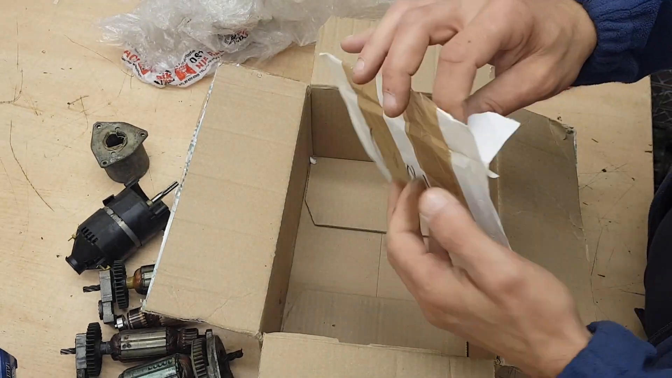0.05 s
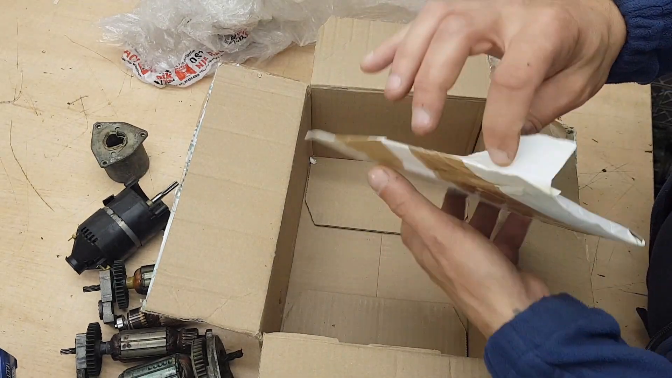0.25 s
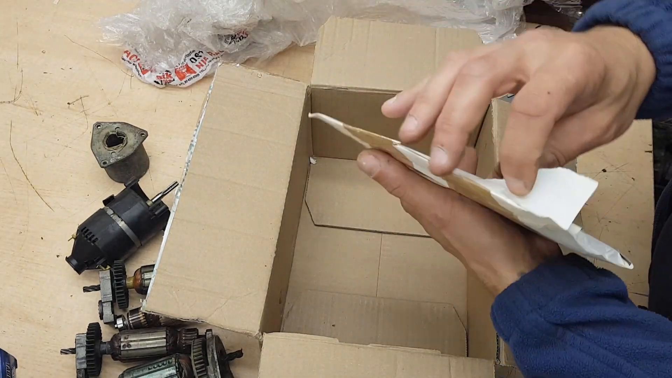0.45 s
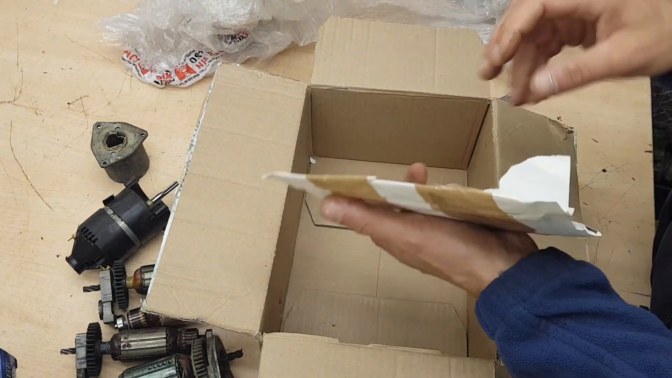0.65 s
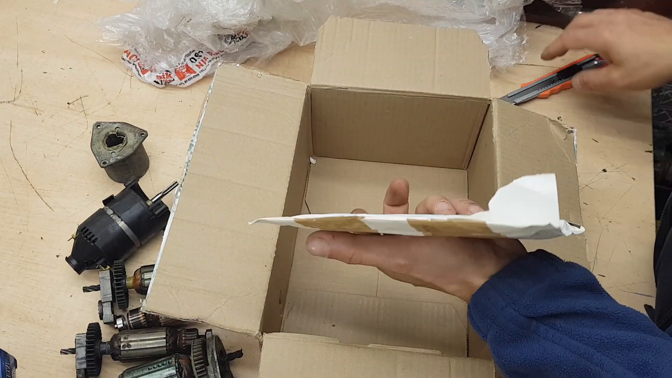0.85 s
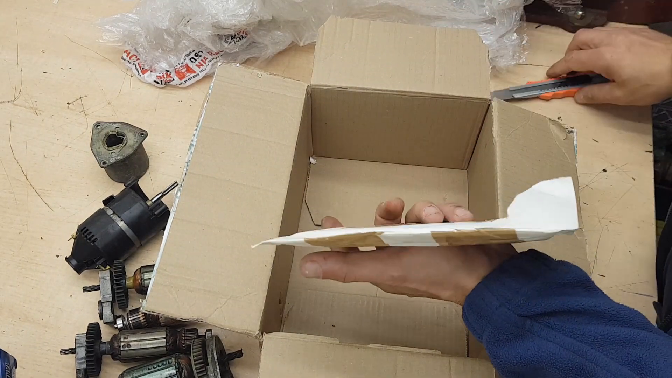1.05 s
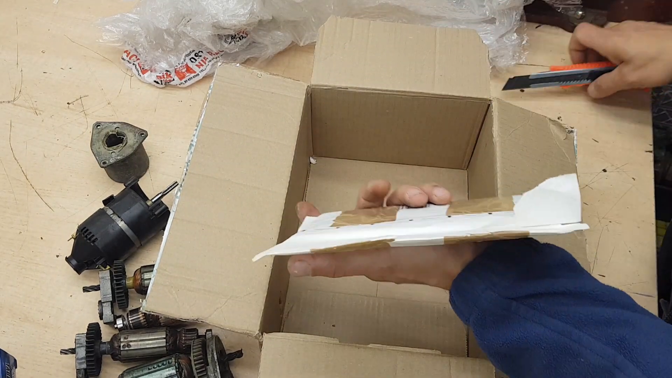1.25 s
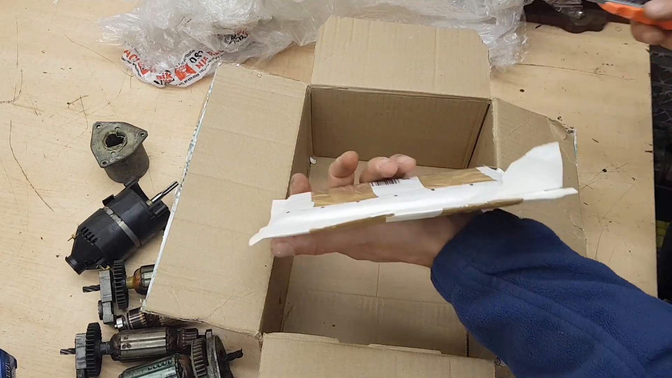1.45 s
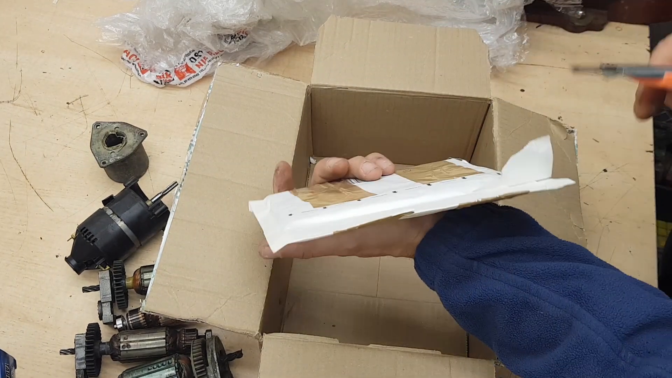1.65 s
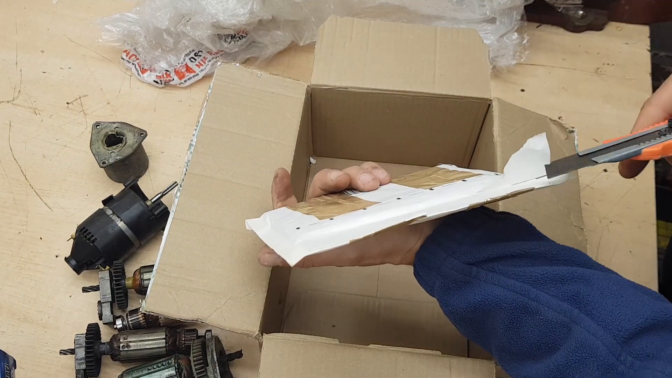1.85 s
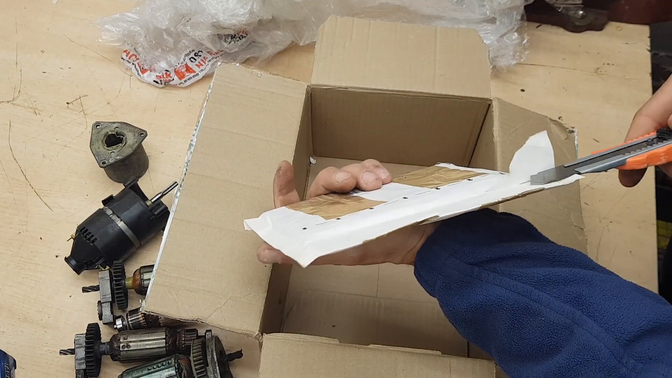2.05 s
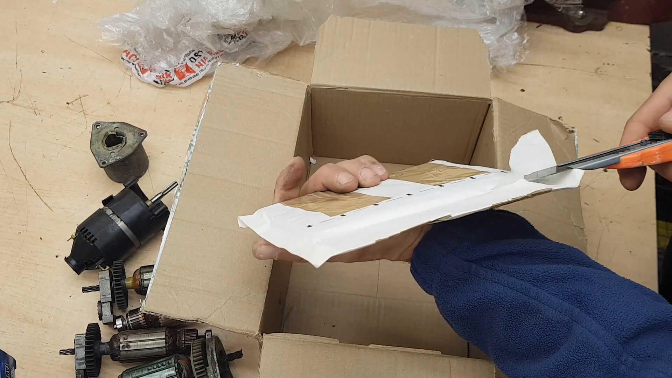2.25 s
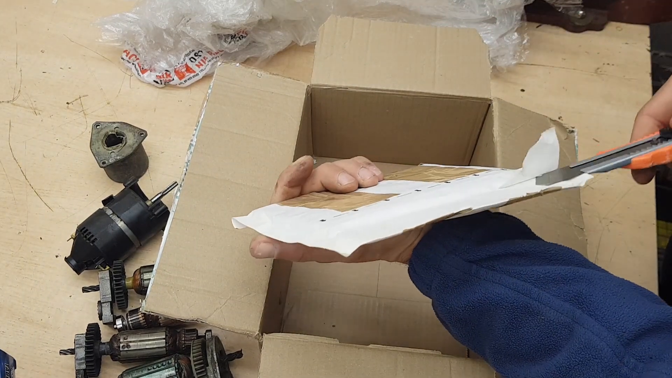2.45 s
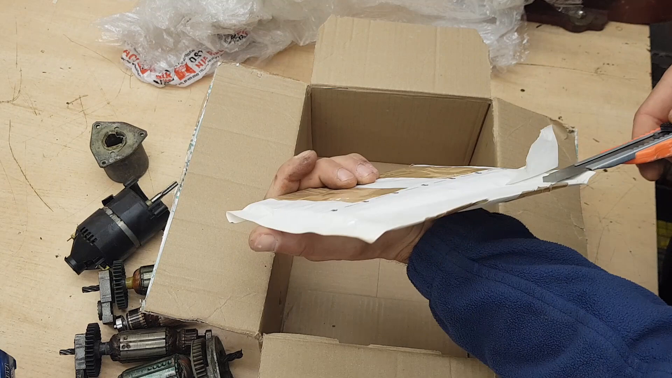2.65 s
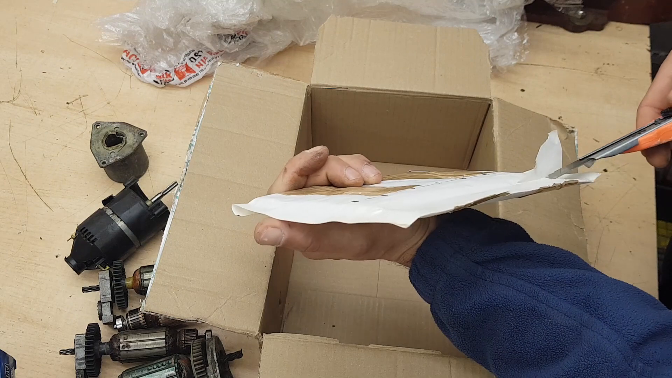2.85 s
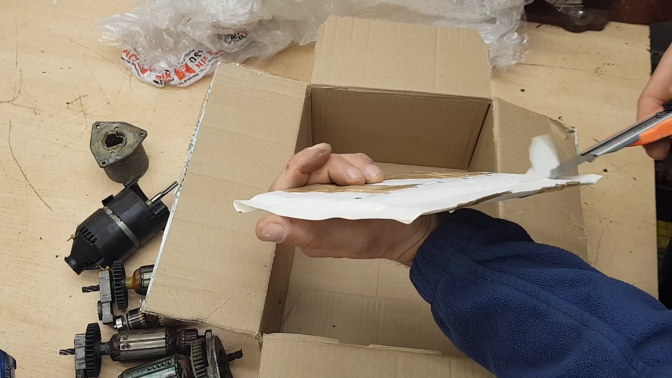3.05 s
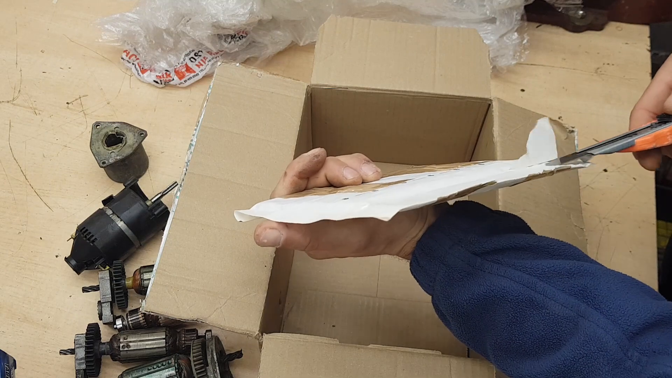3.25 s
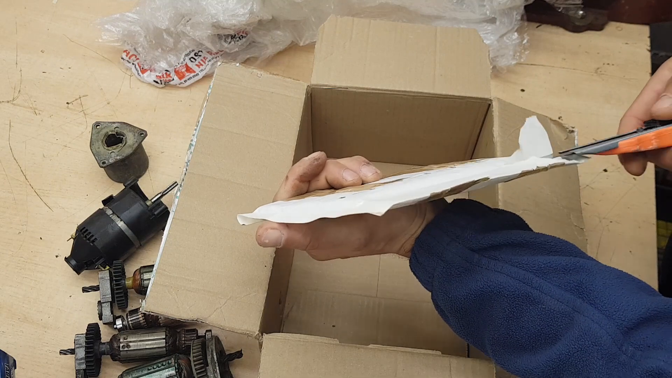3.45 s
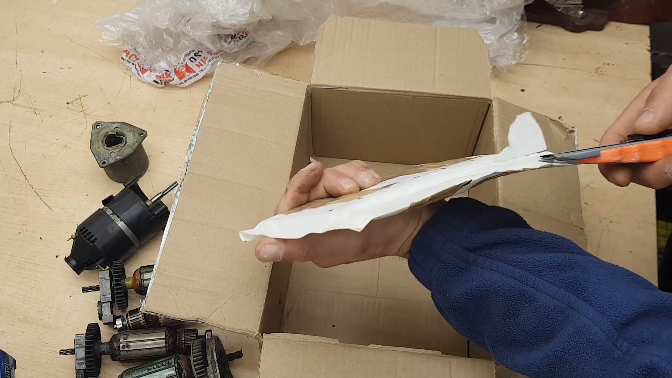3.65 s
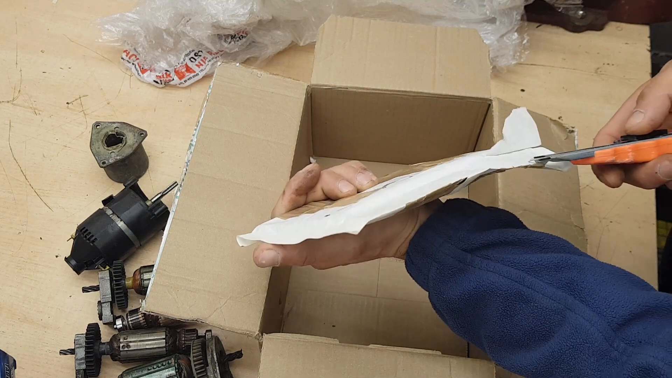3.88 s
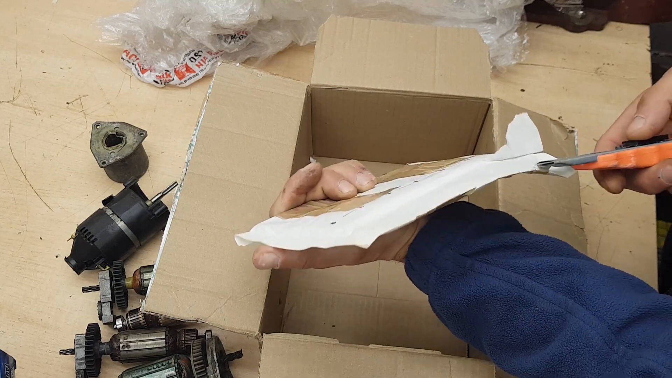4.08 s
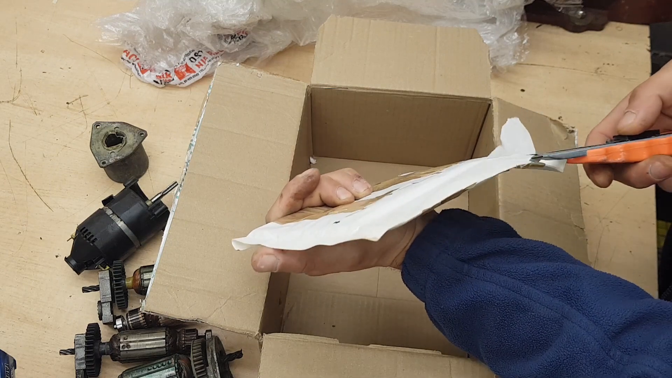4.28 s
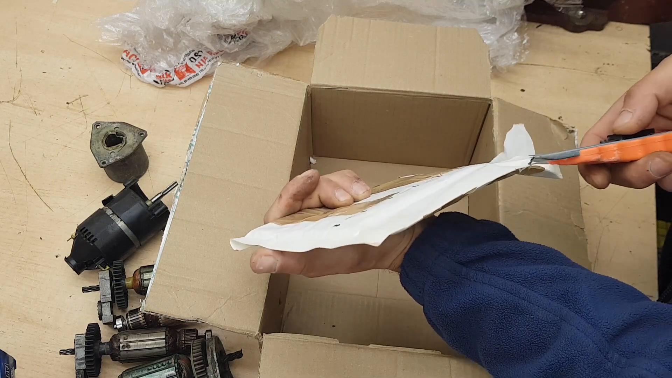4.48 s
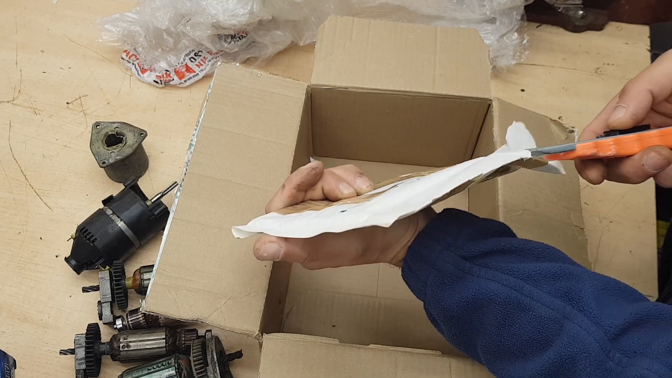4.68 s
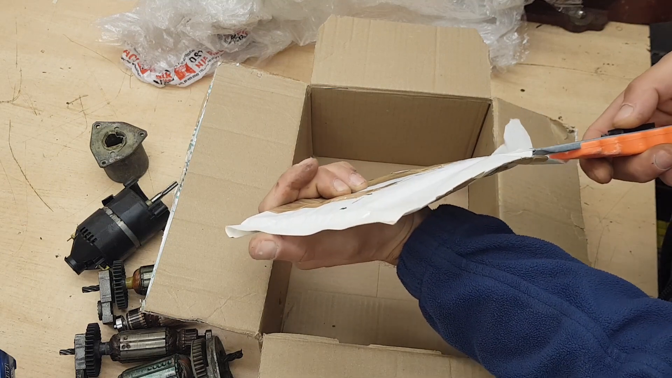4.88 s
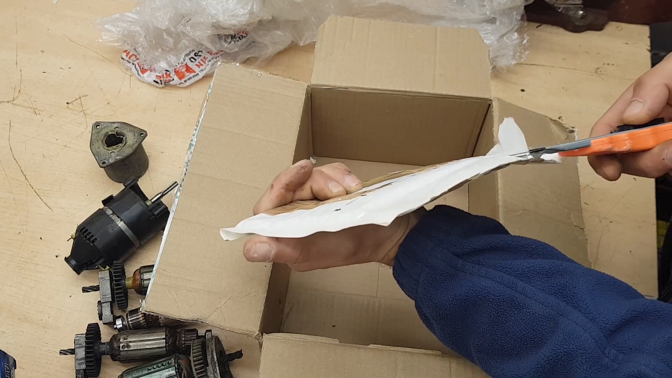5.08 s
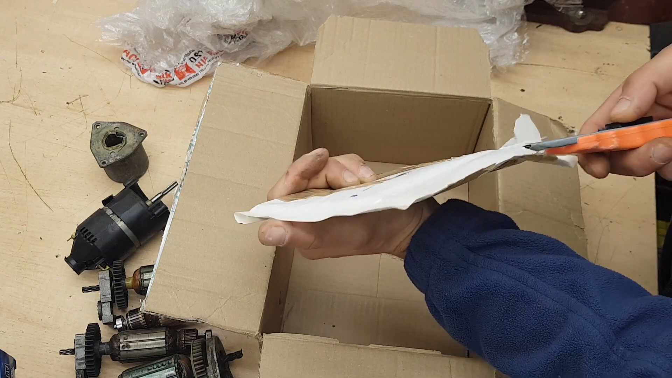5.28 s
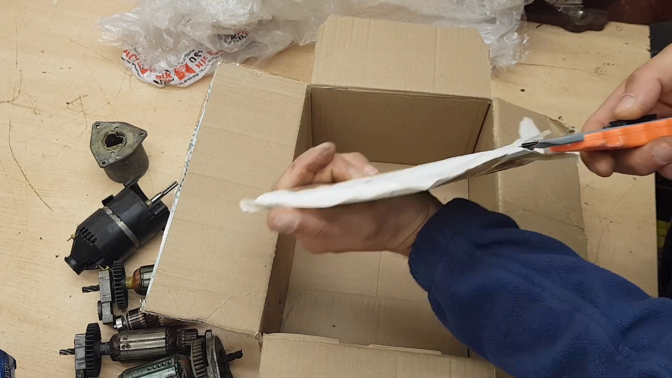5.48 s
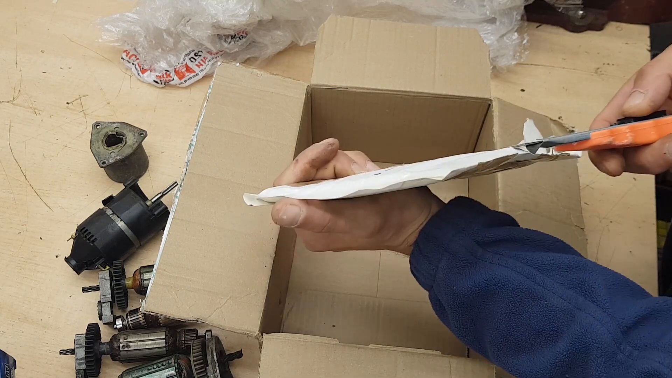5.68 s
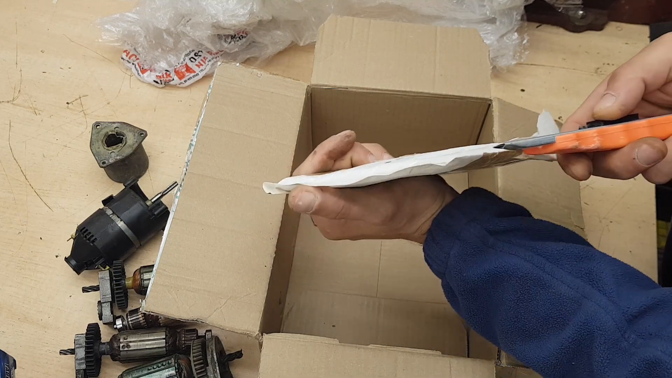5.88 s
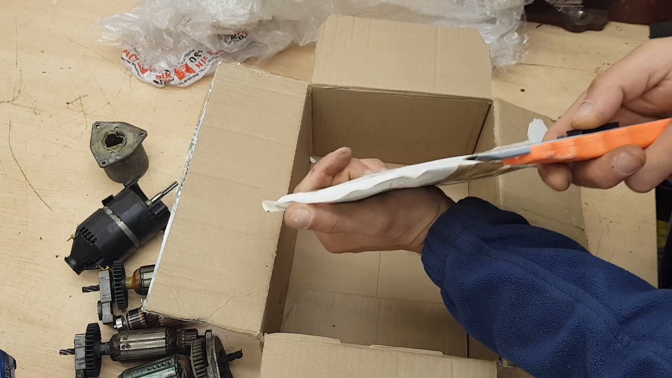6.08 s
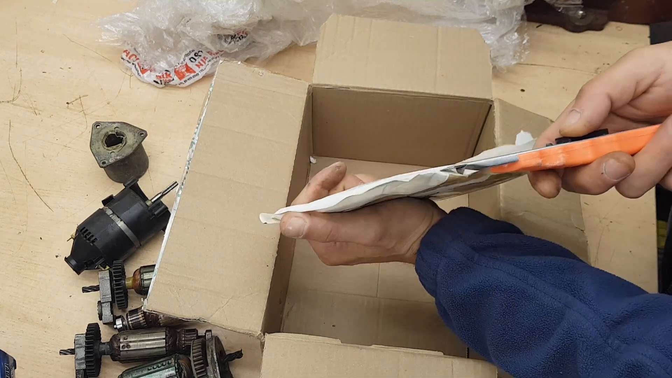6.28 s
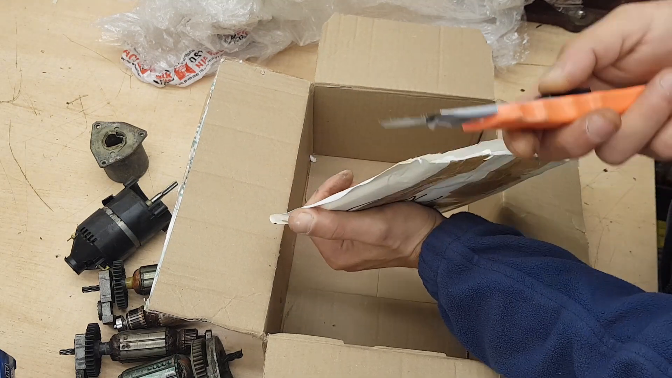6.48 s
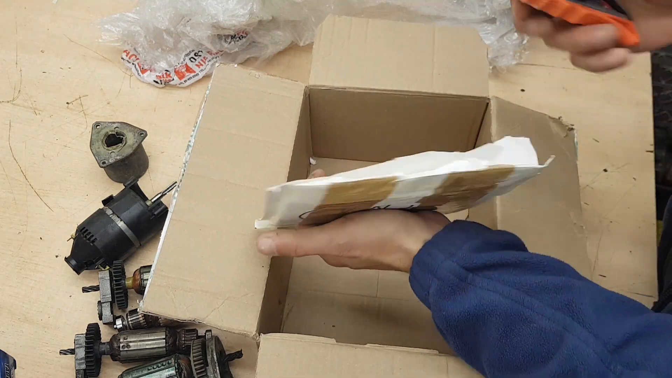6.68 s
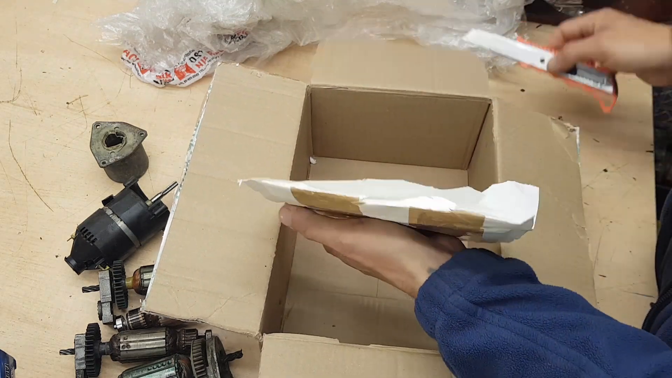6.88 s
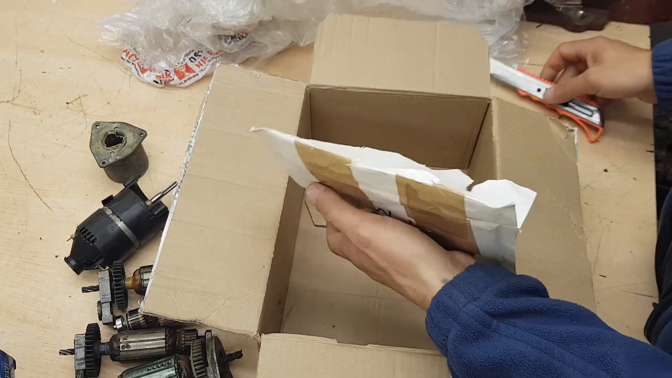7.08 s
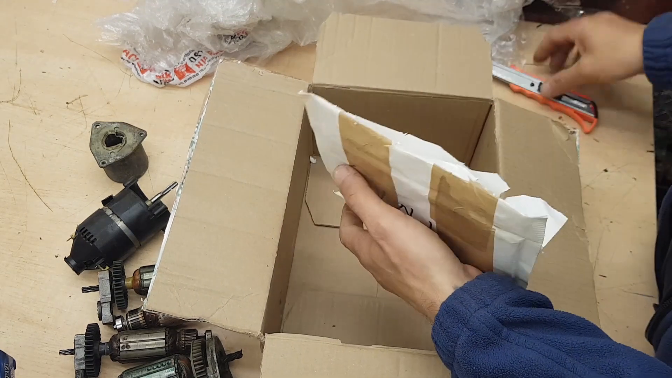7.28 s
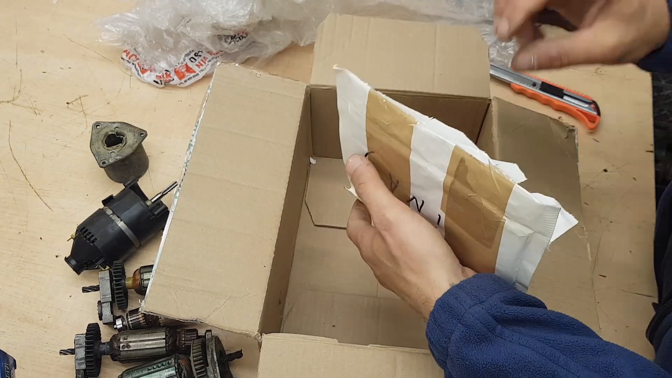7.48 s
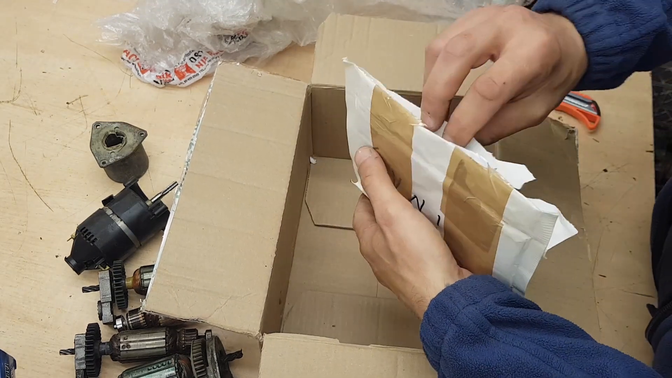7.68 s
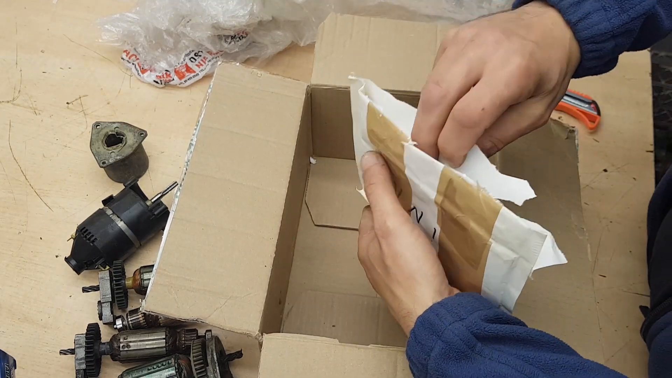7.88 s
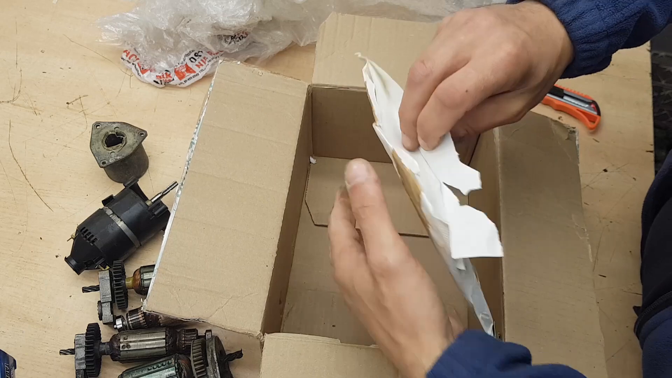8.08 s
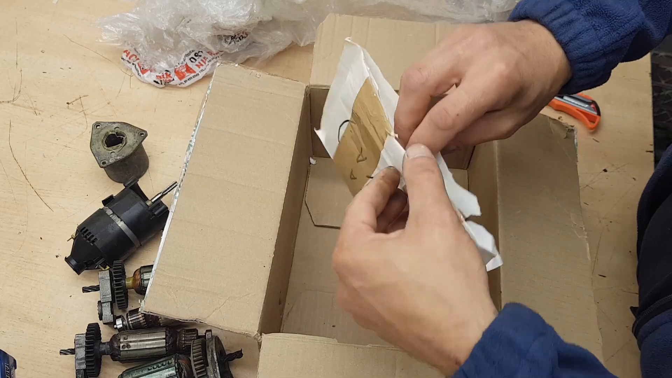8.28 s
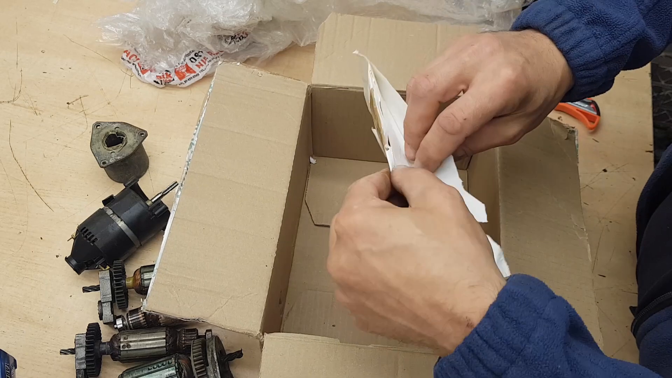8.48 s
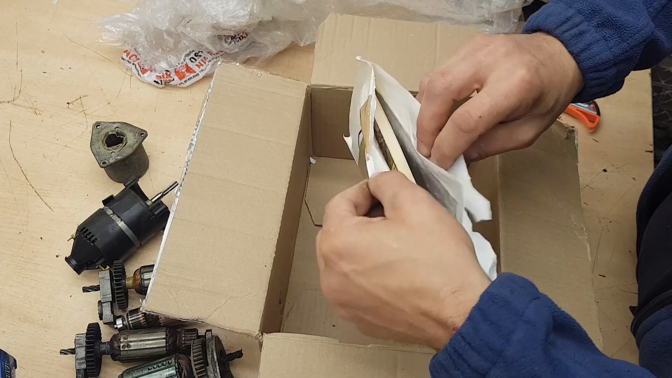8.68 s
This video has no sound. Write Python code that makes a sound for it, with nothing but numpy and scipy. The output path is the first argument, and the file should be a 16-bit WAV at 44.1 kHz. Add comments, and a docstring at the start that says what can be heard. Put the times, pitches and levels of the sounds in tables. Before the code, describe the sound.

In a small quiet workshop, stiff paper crinkles lightly, a knife scrapes off the bench and its blade ratchets out in quick clicks. After soft rustles it saws a taped envelope in short, uneven, gritty strokes that grow stronger, then springs free with a click. The knife knocks hard on wood, and fingers rustle and crackle the paper. Close stereo microphones, short reflections, faint low rumble and hiss.

```python
"""A small, quiet workshop: a padded envelope is slit open with a utility knife above a box on a wooden bench.
The blade ratchets out: filtered noise cracks and ringing steel. It saws the taped edge in short strokes of
snapping fibres, hissing and shaking the envelope, then springs free. The knife lands in a knock of bench
modes and noise, and fingers pull the paper apart in rustling rubs and crinkling flurries of snaps.
Reflections surround it all, over low rumble, faint hum and microphone hiss."""
import sys
import numpy as np
from scipy import signal
from scipy.fft import rfft, irfft
from scipy.io import wavfile
from scipy.ndimage import uniform_filter1d

SR = 44100
rng = np.random.default_rng(int(sys.argv[2]) if len(sys.argv) > 2 else 0)


def dump_mix(stems):
    """Bounce the given channels to the path in sys.argv[1] as a 16-bit WAV at rate SR."""
    frames = np.atleast_2d(stems).T  # one column per channel
    limited = np.clip(frames, -1, 1)  # hard clip at full scale
    pcm = np.round(limited * 32767).astype(np.int16)
    wavfile.write(sys.argv[1], SR, pcm)


N = 384993
TIME = np.arange(N) / SR
HIT_TIME = TIME[:16384]  # the span of one short event


def undb(db):
    """Decibels to gain."""
    return 10 ** (np.asarray(db) / 20)


def unit(x):
    """Scale to rms 1."""
    return x / np.sqrt(np.mean(x ** 2))


def freqs(x):
    """Frequency of each spectral bin of x, at least 1 Hz."""
    return np.maximum(np.fft.rfftfreq(x.shape[-1], 1 / SR), 1)


def colour(x, points):
    """Causal, minimum-phase equaliser through (f/Hz, level/dB) points."""
    hz, db = np.transpose(points)
    log_gain = np.log(undb(np.interp(np.log(freqs(HIT_TIME)), np.log(hz), db)))
    cepstrum = irfft(log_gain)
    half = len(cepstrum) // 2
    # folding the cepstrum onto positive time makes the filter causal
    cepstrum[1:half] *= 2
    cepstrum[half:] = 0
    response = irfft(np.exp(rfft(cepstrum)))
    return signal.fftconvolve(x, response)[:len(x)]


def band(x, hz, kind, order=4):
    """Butterworth filter."""
    corners = np.clip(hz, 20, .45 * SR)
    return signal.sosfilt(signal.butter(order, corners, kind, fs=SR, output="sos"), x)


def fade(t60):
    """Exponential decay over the span of a hit, down 60 dB after t60 seconds."""
    return undb(-60 * HIT_TIME / t60)


def ring(modes):
    """Sum of damped modes, alternately pushed one way and the other."""
    out = np.zeros(len(HIT_TIME))
    for k, (hz, db, t60) in enumerate(modes):
        out += (-1) ** k * undb(db) * fade(t60) * np.sin(2 * np.pi * hz * HIT_TIME)
    return out


def peak(x, db):
    """Bring the rms of the loudest 4 ms to a level."""
    return x * undb(db) / np.sqrt(uniform_filter1d(x ** 2, size=176).max())


def add(track, s, x):
    """Mix x into the track at time s."""
    start = max(round(s * SR), 0)
    track[start:start + len(x)] += x[:N - start]


def snaps(time, rate, spread_db):
    """Fibres snapping at random, rate a second, a few much louder than the rest."""
    chance = rng.random(len(time))
    size = np.clip(rng.standard_normal(len(time)), -2, 2)
    sign = rng.choice([-1, 1], len(time))
    return (chance < rate / SR) * undb(spread_db * size) * sign


def walk(rate):
    """Random wander around 0 along straight lines between rate normal draws a second."""
    knots = rng.standard_normal(4096)
    return np.interp(TIME * rate, np.arange(len(knots)), knots)


def swell(s, db, length):
    """Gain of one push of the hand: it builds up to a peak at s and lets go."""
    rise, fall = 0.46 * length, 0.54 * length  # each reaches 8.7 dB below the peak
    out = np.zeros(N)
    span = slice(max(int((s - 4 * rise) * SR), 0), int((s + 4 * fall) * SR))
    lag = TIME[span] - s
    out[span] = undb(db) * np.exp(-np.maximum(-lag / rise, lag / fall) ** 1.5)
    return out


def pushes(rows):
    """Gain of a series of pushes that share one shape, summed as power."""
    return sum(swell(*row) ** 2 for row in rows) ** .5


# Sawing strokes: peak t/s, push level/dB, length/s between the points 8.7 dB below the peak
SAWING_STROKES = [(3.511, -52, 0.21), (3.63, -40, 0.058), (3.744, -36, 0.054), (3.909, -49.5, 0.15),
                  (4.318, -54, 0.13), (4.473, -44, 0.073), (4.611, -57.5, 0.069), (4.762, -37.5, 0.035),
                  (4.827, -46.5, 0.098), (5.001, -56.5, 0.043), (5.1, -55.5, 0.017), (5.139, -41.5, 0.053),
                  (5.262, -38.5, 0.069), (5.436, -37.5, .08), (5.584, -36, 0.1), (5.714, -35.5, 0.043),
                  (5.868, -31.5, 0.1), (6.078, -39.5, 0.046), (6.228, -37, 0.042), (6.379, -30, 0.076)]
# Tone balance of the cut: f/Hz, relative level/dB
CUT_COLOUR = [(160, -18), (280, -7), (426, -15), (705, -4.5), (1060, -2.5), (1130, -3.5), (2570, 4.5),
              (7040, -3.5), (9210, 0), (15500, -3.5)]
SHAKE_DB, SHAKE_LAG_S = -6.5, 0.011  # the envelope's body follows the hiss
SHAKE_LENGTH_S, SHAKE_DB_PER_DOUBLING = 0.047, 0.6  # longer strokes shake the body harder


def sawing():
    """The edge catches and slips through fibres; they hiss, shake the envelope and make the pinched blade sing."""
    fibres = snaps(TIME, rate=5000, spread_db=6) * undb(2.8 * walk(rate=220) + 1.3 * walk(rate=60))
    tugs = snaps(TIME, rate=1400, spread_db=2)
    hiss = unit(band(colour(fibres, CUT_COLOUR), 2000, "high"))
    body = unit(band(colour(tugs, CUT_COLOUR), 1300, "low"))
    blade_hz = BLADE_MODES[0][0]
    blade = unit(band(fibres, [blade_hz - 150, blade_hz + 150], "band", order=1))
    force = pushes(SAWING_STROKES)
    shakes = []
    for s, db, length in SAWING_STROKES:
        length_db = SHAKE_DB_PER_DOUBLING * np.log2(length / SHAKE_LENGTH_S)
        shakes.append((s + SHAKE_LAG_S, db + SHAKE_DB + length_db, length))
    effort = force / force.max()
    # the blade sings out only under the hardest strokes
    song = undb(-8) * effort * blade
    # single ticks stand out in the gentle strokes
    loose_ticks = undb(-49.5) * np.sqrt(effort) * ticks()
    return force * (undb(3.0) * hiss + song) + pushes(shakes) * body + loose_ticks


# Creases buckling and tape popping: t/s, level/dB, sharpness/dB (taut tape is sharp, a slack fold is blunt)
CRINKLE_EVENTS = [(0.0163, -41.5, 2), (0.173, -42.5, -1), (0.3096, -41.5, -7), (0.5063, -48, -10.5),
                  (1.9996, -42.5, 8.5), (2.409, -46.5, -6), (2.6802, -38.5, 0.5), (2.7485, -44, 3),
                  (2.9077, -41, -1.5), (3.3282, -35.5, 5), (3.592, -37, 0), (3.831, -41.5, -3.5),
                  (4.0005, -30.5, -0.5), (4.1922, -37.5, 2), (4.3863, -42.5, 5.5), (5.4162, -27, 0),
                  (5.5193, -34.5, 6.5), (7.736, -32.5, 2.5), (7.873, -32.5, -2.5), (8.022, -41.5, -9.5),
                  (8.1061, -35.5, -7), (8.1415, -36, -4), (8.3602, -46, -7.5), (8.5398, -46, -0.5),
                  (8.6993, -41.5, -10.5)]
# Tone balance of stiff paper: f/Hz, relative level/dB
PAPER_COLOUR = [(220, -11.5), (380, -15), (718, -10), (1060, -11), (1160, -9), (1360, -8.5), (3140, -4.5),
                (11500, -14), (15500, -23)]


def crinkles():
    """A crease gives way in a quick flurry of snaps with a faint tail; a sharper one has less body."""
    out = np.zeros(N)
    for s, db, sharp_db in CRINKLE_EVENTS:
        decay = fade(t60=0.0034) + undb(-23.5) * fade(t60=0.21)
        flurry = snaps(HIT_TIME, rate=4000, spread_db=5) * decay
        onset = 1 - fade(t60=0.0035)
        sheet = colour(flurry * onset, PAPER_COLOUR)
        add(out, s, peak(band(sheet, [1000, 6000], "band"), db - 0.5))
        add(out, s, peak(band(sheet, 1000, "low"), db - 10 - 1.15 * sharp_db))
        add(out, s, peak(band(sheet, 7560, "high"), db - 3 + sharp_db))
    return out


def ticks():
    """Sparse, separate ticks of stiff paper giving way."""
    return unit(colour(snaps(TIME, rate=45, spread_db=3), PAPER_COLOUR))


def rustle():
    """Grainy noise of a surface that catches and slips."""
    grains = snaps(TIME, rate=900, spread_db=6) * undb(3.5 * walk(rate=80))
    return unit(unit(colour(grains, PAPER_COLOUR)) + undb(-3) * ticks())


# Paper and tape rubbing: start t/s, push level/dB, time before release/s
RUBS = [(0.33, -53, 0.036), (0.419, -49, 0.016), (0.532, -52.5, 0.043), (2.096, -50, 0.08),
        (2.326, -49, 0.098), (2.556, -50, 0.03), (2.993, -54, 0.081), (3.154, -46.5, 0.045),
        (6.804, -47, 0.13), (7.072, -52.5, 0.14), (7.226, -62.5, 0.21), (7.679, -55.5, 0.084),
        (7.884, -37.5, 0.02), (8.261, -53.5, 0.064), (8.437, -57.5, .06), (8.596, -42, 0.07)]
GRIP_S, RELEASE_S = 0.0042, 0.04  # a rub grips at once, holds, then lets go
LIGHT_TOUCH_DB, DAMPING_DB_PER_DB = -56.5, 0.53  # pressing harder than this damps the sheet's treble


def sliding():
    """A light, grainy rustle that catches and slips; a firmer touch damps its treble."""
    bright = rustle()
    dull = band(bright, 2800, "low", order=1)
    push, bite = np.zeros((2, N))
    for s, db, length in RUBS:
        grip = 1 - np.exp(-HIT_TIME / GRIP_S)
        release = np.exp(-np.maximum(HIT_TIME - length, 0) / RELEASE_S)
        rub = undb(db) * grip * release
        add(push, s, rub)
        add(bite, s, rub * undb(-DAMPING_DB_PER_DB * (db - LIGHT_TOUCH_DB)))
    return push * dull + bite * (bright - dull)


# Slider catching in its notches, blade rattling in its channel: t/s, level/dB, treble/dB,
# before the fixed boosts in knife()
CLICK_EVENTS = [(1.2257, -42, -25.5), (1.388, -76.5, 2), (1.423, -45.5, -20), (1.4845, -36.5, -25),
                (1.517, -32, -24), (1.616, -44, -28), (1.672, -39, -16), (1.6872, -36.5, -43),
                (1.7375, -43.5, -40), (1.8125, -54, -28), (2.0615, -41, -34), (4.1093, -45.5, -37),
                (6.4475, -26.5, -30.5), (6.476, -64.5, 5), (6.676, -43, -40), (6.852, -36.5, -22.5)]
# Tone balance of the handle: f/Hz, relative level/dB
HANDLE_COLOUR = [(410, -46.5), (700, -43.5), (1370, -18), (1850, -14.5), (2490, -3), (2990, -17),
                 (4130, -12.5), (7310, -25), (11200, -21), (12100, -20.5), (15500, -30.5)]
# Ringing steel blade: f/Hz, relative level/dB, t60/s
BLADE_MODES = [(9166, -4, .12), (11774, 0, .19)]
BLADE_FREE_S, BLADE_FREE_DB = 6.48, -55.5


def knife():
    """Each catch cracks through the plastic handle and rings the blade, which also rings on leaving the cut."""
    out, blade = np.zeros(N), ring(BLADE_MODES)
    for s, db, treble_db in CLICK_EVENTS:
        # the contact takes a moment to build, then the loose parts rattle on
        shape = (1 - fade(t60=0.0068)) * (fade(t60=0.0078) + undb(-13.0) * fade(t60=0.14))
        handle = colour(rng.standard_normal(len(HIT_TIME)) * shape, HANDLE_COLOUR)
        crack = peak(band(handle, 6000, "low"), db + 4.0)
        steel = peak(band(handle, 6000, "high"), 0) + peak(blade, -21)
        add(out, s, crack + peak(steel, db + treble_db + 26.5))
    add(out, BLADE_FREE_S, peak(blade, BLADE_FREE_DB))
    return out


# Knife and hand meeting the bench: t/s, level/dB, contact corner f/Hz (soft contacts are dull)
KNOCK_EVENTS = [(6.9238, -11, 9770), (6.929, -25, 8030), (7.162, -32, 7900), (7.169, -39.5, 380),
                (7.249, -41, 498), (7.290, -40.5, 266), (7.365, -42.5, 182), (7.383, -38.5, 156)]
# Bench top with the knife on it: f/Hz, relative level/dB, t60/s
BENCH_MODES = [(167, -13, 0.46), (249, -15, 0.4), (356.4, -2, 0.088), (398, -10, 0.23), (472, 2.5, 0.1),
               (729, 1, 0.076), (881, -3, 0.081), (1368, 7, 0.036), (1595, 6, .07), (2245, 5.5, 0.059),
               (3054, -5, 0.1)]


def knocks():
    """A blow rings the bench and cracks the knife's shell; a softer contact keeps only the low modes."""
    out, wood = np.zeros(N), peak(ring(BENCH_MODES), 0)
    for s, db, contact_hz in KNOCK_EVENTS:
        noise = rng.standard_normal((2, len(HIT_TIME)))
        crack = peak(band(noise[0], 1200, "high", order=1) * fade(t60=0.097), 0.77)
        # a soft contact scuffs on for longer
        scuff = fade(t60=.055 + 14 / contact_hz)
        thud = peak(band(noise[1], [170, 1800], "band", order=2) * scuff, -5)
        blow = band(wood + crack + thud, contact_hz, "low", order=2)
        # a hard contact moves less of the heavy top's bass
        add(out, s, peak(band(blow, contact_hz / 36, "high", order=3), db))
    return out


def drag():
    """The handle scrapes grainily over the wood as the knife is picked up, and the bench rumbles under it."""
    rumble = unit(band(rng.standard_normal(N), [170, 372], "band", order=2))
    return swell(s=1.159, db=-37.5, length=0.06) * (rustle() + undb(-6.5) * rumble)


def spread(pair, alike_hz):
    """Two unrelated signals become a diffuse field: alike at both ports in the bass, unrelated above."""
    alike = 1 / (1 + (freqs(pair) / alike_hz) ** 2)
    mid, side = rfft(pair) * np.sqrt([1 + alike, 1 - alike])
    return irfft([mid + side, mid - side], pair.shape[-1]) / np.sqrt(2)


def room(x, near_db, far_db, near_t60, far_t60, steps):
    """Direct sound, quick reflections off box and bench, and the workshop's longer tail.
    The source moves in equal steps, crossfading between places with their own reflections."""
    near = undb(near_db) * unit(fade(near_t60))
    far = undb(far_db) * unit(fade(far_t60))
    tail = np.hypot(near, far) / np.sqrt(len(HIT_TIME))
    out, hop = np.zeros((2, N)), N // steps + 1
    for centre in range(0, N + hop, hop):
        response = spread(rng.standard_normal((2, len(tail))) * tail, alike_hz=815)
        response[0, 3] += 1  # the left port is three samples further away
        response[1, 0] += 1
        response /= np.sqrt(np.sum(response ** 2) / 2)
        span = np.arange(max(centre - hop, 0), min(centre + hop, N))
        piece = x[span] * np.cos(np.pi / 2 * (span - centre) / hop)
        for track, echo in zip(out, response):
            add(track, span[0] / SR, signal.fftconvolve(piece, echo))
    return out


# Tone balance of the background: f/Hz, relative level/dB
WORKSHOP_COLOUR = [(24, -17), (40, 5), (71, -15.5), (101, -20), (126, -44), (150, -18.5), (170, -41),
                   (192, -25), (287, -26.5), (350, -36.5), (417, -38), (6980, -41), (15500, -35)]
WORKSHOP_DB, HUM_DB = -57, -67.5


def workshop():
    """Gently wavering low rumble and microphone hiss, with a faint, narrow-band hum of the room."""
    air = np.array([unit(colour(rng.standard_normal(N), WORKSHOP_COLOUR)) for _ in range(2)])
    rumble = unit(band(spread(air, alike_hz=220), 48.4, "high", order=8))
    hum = unit(band(rng.standard_normal((2, N)), [158, 180], "band", order=2))
    level = undb(WORKSHOP_DB + 1.2 * walk(rate=3.7))
    return rumble * level + undb(HUM_DB) * spread(hum, alike_hz=260)


def scene():
    """Paper and knife sound in the air above the box; the low modes of the bench arrive more directly."""
    blows = knocks()
    wood = band(blows, 2000, "low", order=1)
    in_air = sawing() + crinkles() + sliding() + knife() + drag() + blows - wood
    held = room(in_air, near_db=8.5, far_db=2.5, near_t60=0.034, far_t60=0.24, steps=160)
    bench = room(wood, near_db=-6, far_db=-13, near_t60=.06, far_t60=.25, steps=1)
    return held + bench + workshop()


HUSH_BELOW_DB, HUSH_DEPTH_DB, HUSH_WINDOW_S, HUSH_HZ = -60, -9, 0.11, 380


def hush(x):
    """Noise suppressor: the hiss sinks where the treble power around it is low."""
    treble = irfft(rfft(x) / (1 + (HUSH_HZ / freqs(x)) ** 4), N)
    power = uniform_filter1d(np.mean(treble ** 2, axis=0), size=int(HUSH_WINDOW_S * SR))
    quiet = 1 / (1 + (power / undb(HUSH_BELOW_DB) ** 2) ** 2)
    return x - treble * (1 - undb(HUSH_DEPTH_DB * quiet))


# Two microphone ports: f/Hz, left minus right level/dB
PORT_DIFFERENCE = [(400, 1), (3700, 2.5), (5500, -2.5), (7400, -4.5), (9600, 2.5), (12500, -3)]
TOP_HZ = 15900


def record(dry):
    """Pauses are hushed, each port has its own colour and the top is cut steeply."""
    ports = []
    for x, side in zip(hush(dry), (1, -1)):
        half_difference = [(hz, side * db / 2) for hz, db in PORT_DIFFERENCE]
        ports.append(colour(x, half_difference))
    return signal.sosfilt(signal.ellip(10, .2, 70, TOP_HZ, fs=SR, output="sos"), ports)


dry = scene()
out = record(dry)
dump_mix(out)
```